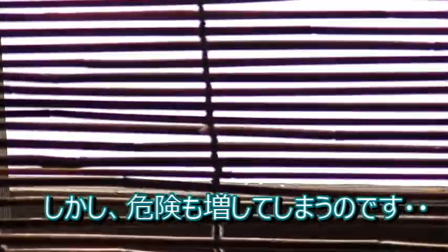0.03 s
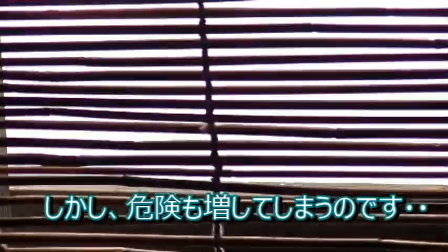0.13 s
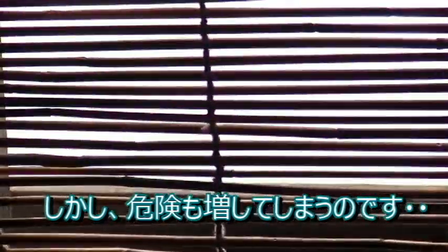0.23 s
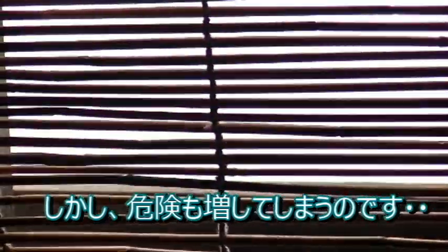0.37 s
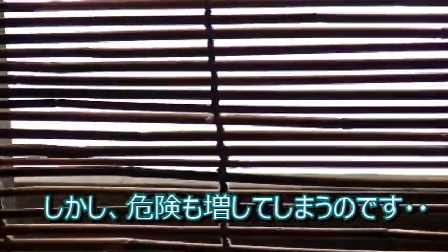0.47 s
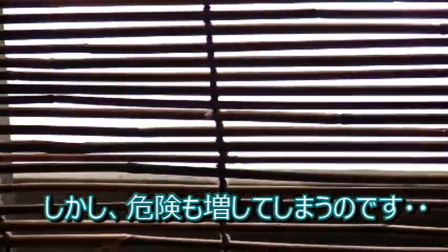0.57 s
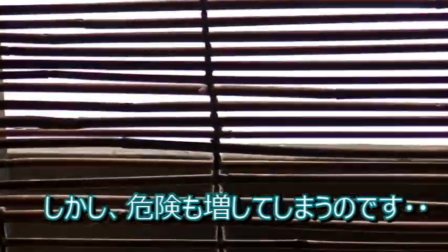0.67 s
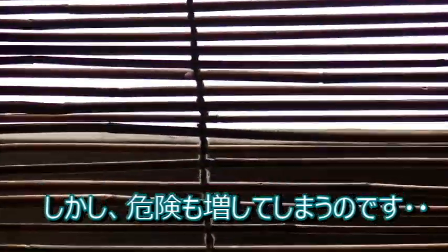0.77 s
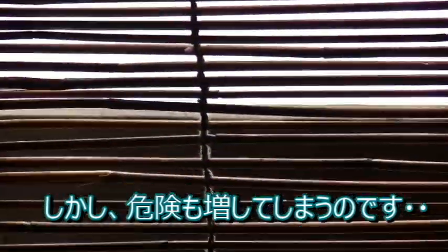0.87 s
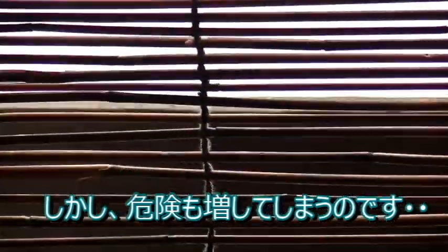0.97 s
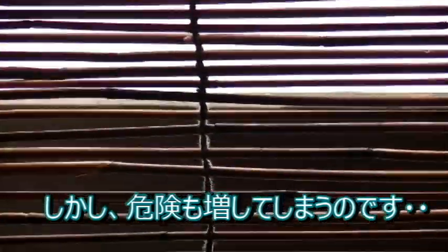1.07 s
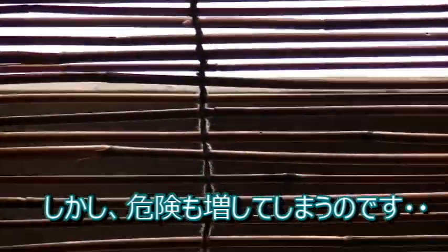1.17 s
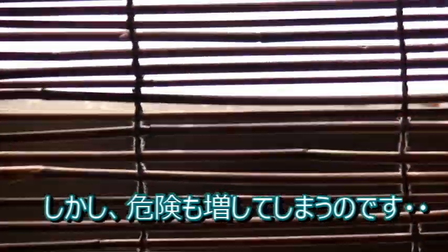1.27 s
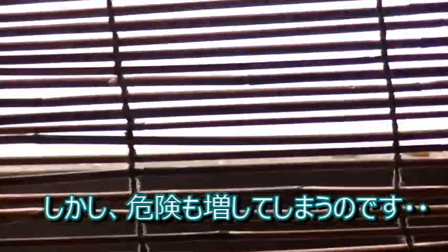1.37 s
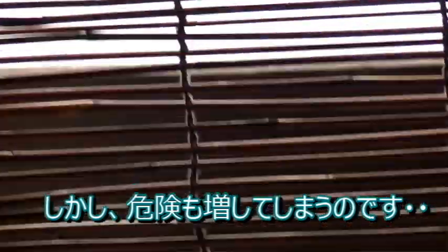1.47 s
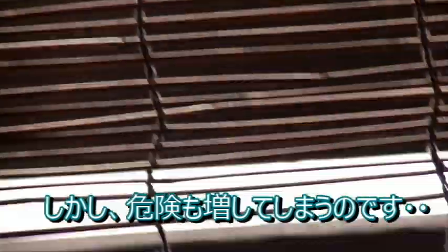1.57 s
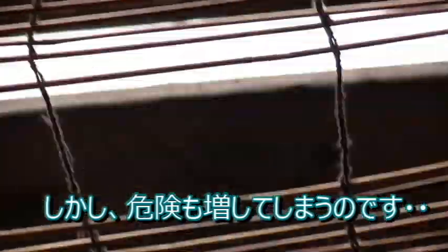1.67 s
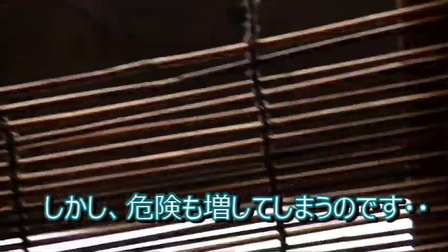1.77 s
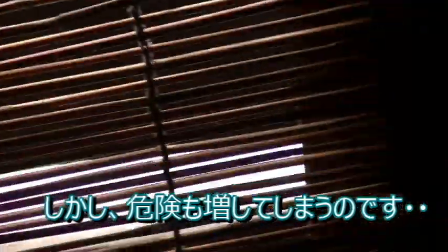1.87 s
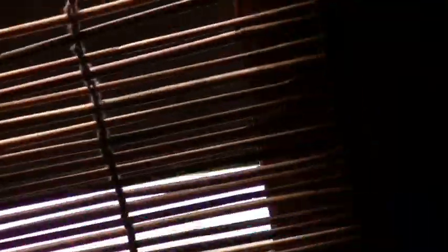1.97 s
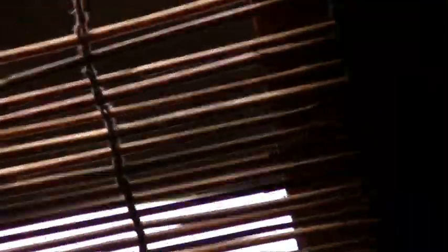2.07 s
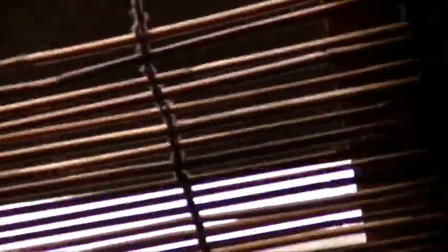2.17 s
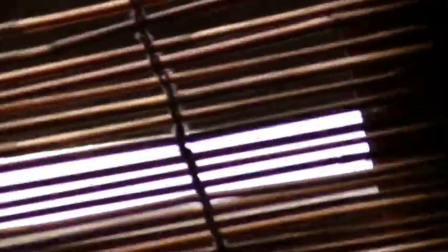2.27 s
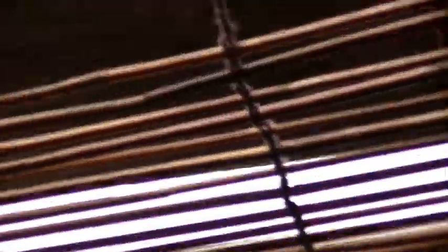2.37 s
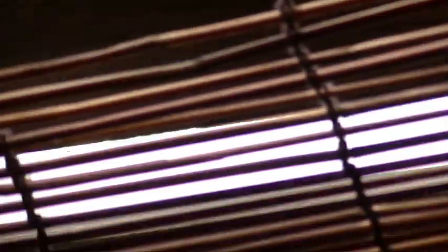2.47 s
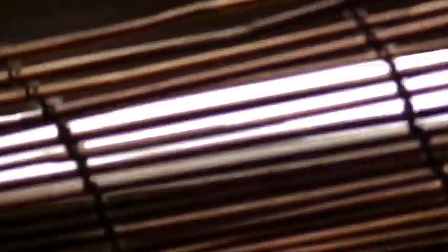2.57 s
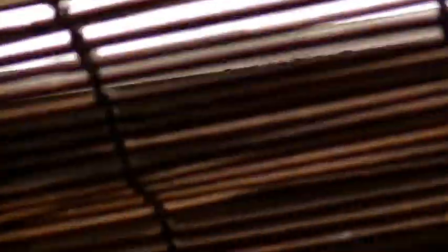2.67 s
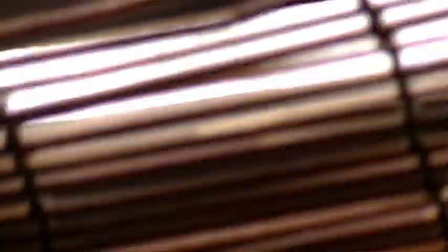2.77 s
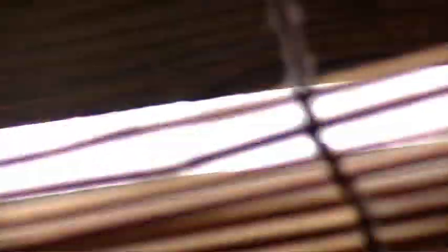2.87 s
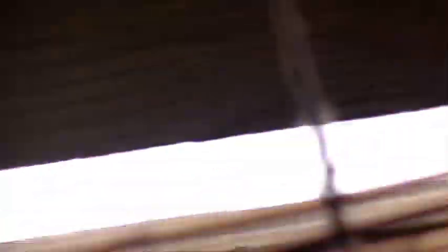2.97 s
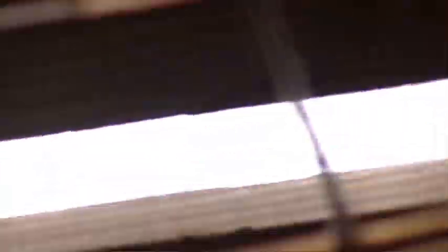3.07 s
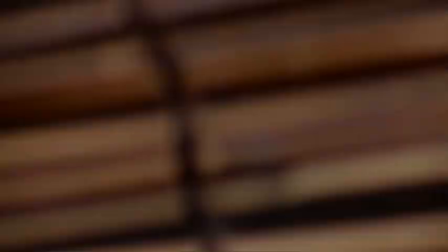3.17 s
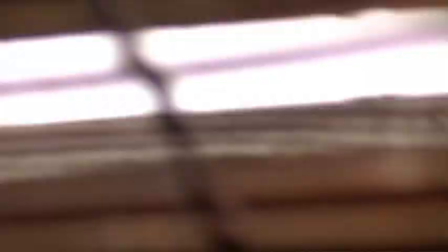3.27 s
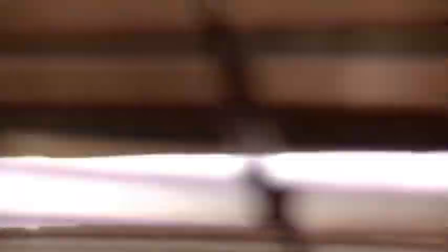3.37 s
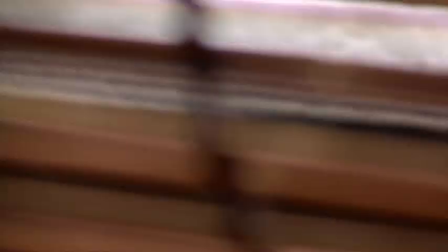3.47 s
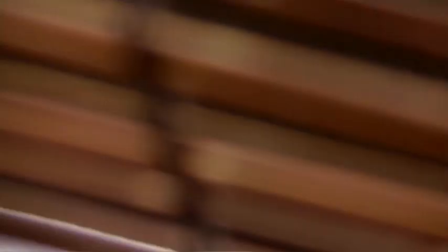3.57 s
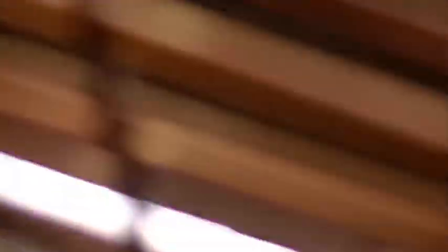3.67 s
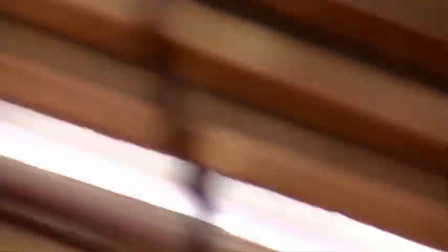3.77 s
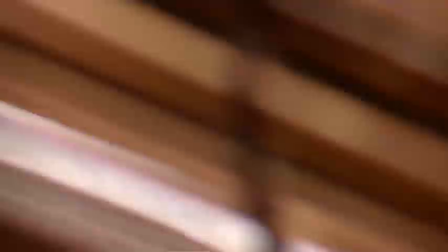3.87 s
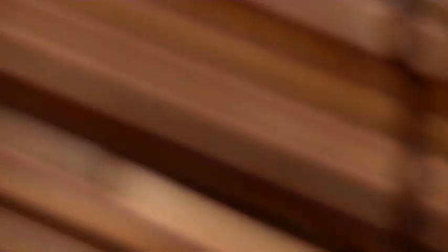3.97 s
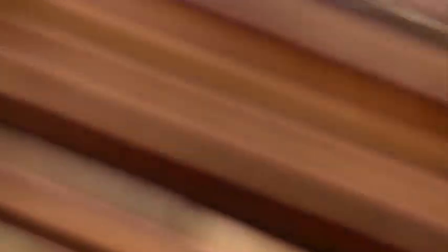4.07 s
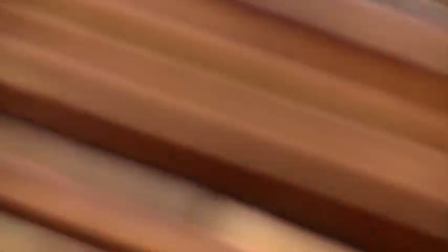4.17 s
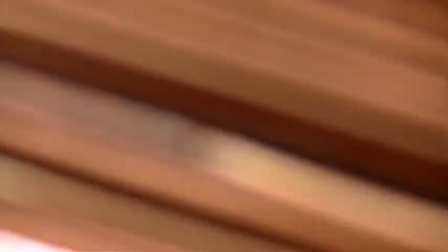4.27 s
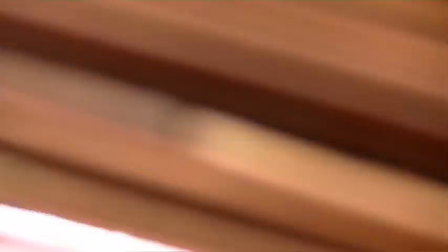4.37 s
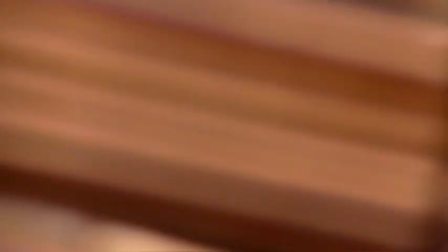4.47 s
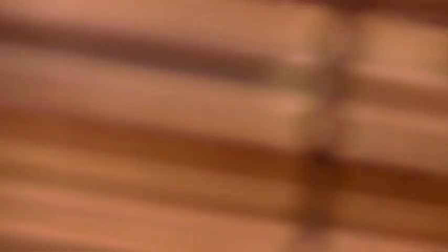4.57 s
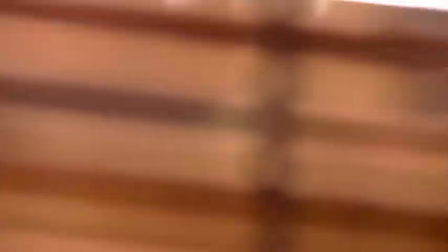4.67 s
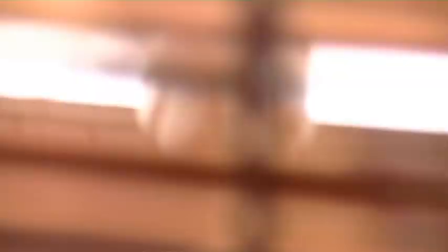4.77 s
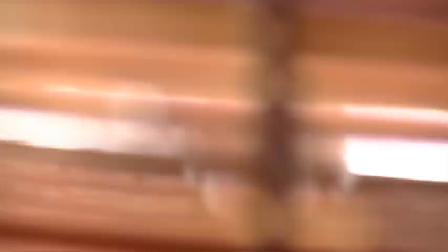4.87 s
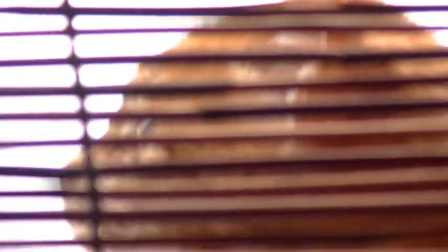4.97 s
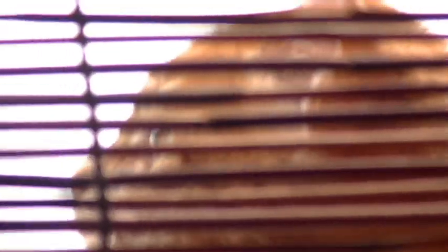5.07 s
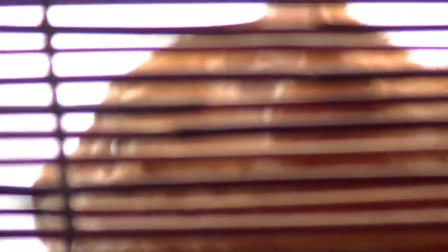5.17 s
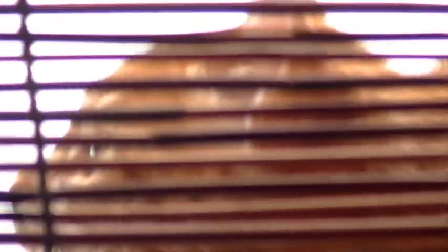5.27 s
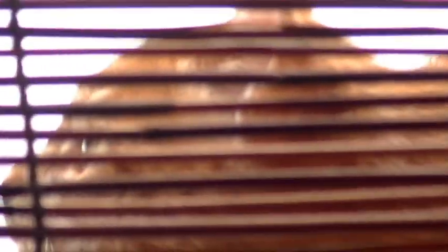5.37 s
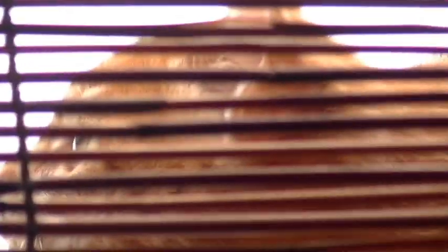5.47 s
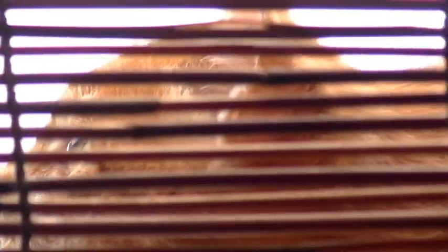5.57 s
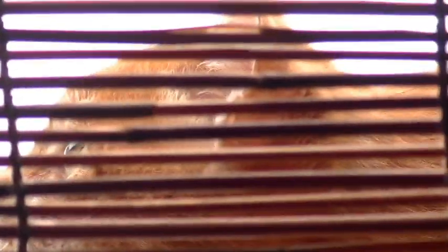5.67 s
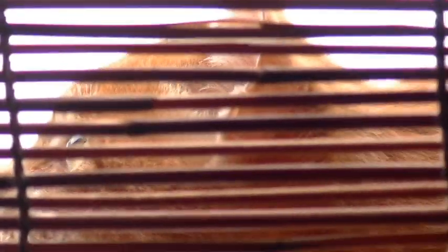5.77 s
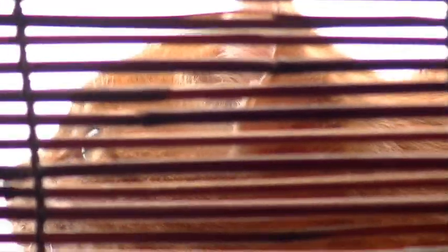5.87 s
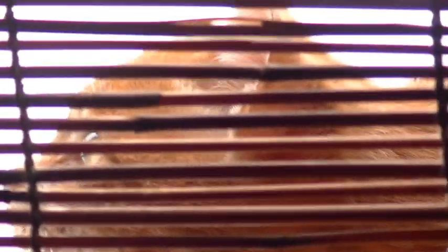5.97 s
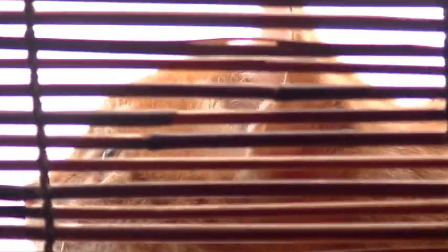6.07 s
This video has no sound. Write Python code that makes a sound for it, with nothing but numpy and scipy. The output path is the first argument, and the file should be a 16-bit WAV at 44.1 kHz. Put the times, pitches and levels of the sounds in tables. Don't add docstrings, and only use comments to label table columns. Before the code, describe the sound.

Faint handling taps and reed rustles grow into sharp, boxy plastic knocks and snaps, then abruptly give way to soft hum and hiss.

```python
import sys
import numpy as np
from scipy import signal
from scipy.fft import rfft, irfft
from scipy.io import wavfile
from scipy.ndimage import uniform_filter1d

SR = 44100
rng = np.random.default_rng(int(sys.argv[2]) if len(sys.argv) > 2 else 0)


def wav_record(signal):
    frames = np.transpose(np.atleast_2d(signal))
    bounded = np.clip(frames, -1, 1)
    quanta = np.round(bounded * 32767).astype(np.int16)
    wavfile.write(sys.argv[1], SR, quanta)


def to_linear_factor(level_db):
    exponent = np.asarray(level_db, float) / 20
    return 10 ** exponent


N = 269892
TIME = np.arange(N) / SR
BIN_HZ = np.fft.rfftfreq(N, 1 / SR)
CHANGE_S = 4.948
OPPOSITE = np.array([[1], [-1]])


def unit(x):
    return x / np.sqrt(np.mean(x ** 2))


def band(x, lo_hz, hi_hz):
    return signal.sosfilt(signal.butter(2, [lo_hz, min(hi_hz, .45 * SR)], "band", fs=SR, output="sos"), x)


def on_log(table, hz):
    points_hz, values = np.transpose(table)
    return np.interp(np.log(hz + 1), np.log(points_hz), values)


def colour(x, spectrum):
    return unit(irfft(rfft(x) * to_linear_factor(on_log(spectrum, BIN_HZ)), N))


def curve(table):
    start_s, level_db = np.transpose(table)
    return np.interp(TIME, start_s, level_db)


def walk(rate_hz):
    k = int(SR / rate_hz)
    return unit(uniform_filter1d(uniform_filter1d(rng.standard_normal(N), k), k))


def grit(spread_db):
    return unit(rng.standard_normal(N) * to_linear_factor(spread_db * np.minimum(rng.exponential(size=N), 6)))


def decay(t, t60_s):
    return np.exp(-np.log(1000) * t / t60_s)


def add(out, start_s, y):
    i = max(int(start_s * SR), 0)
    out[..., i:i + y.shape[-1]] += y[..., :N - i]


def ring(modes, contact_s, scatter_db, detune, soft_hz, lean_db=0., clatter=0.77, rough=0.45):
    hz, db, t60_s = np.transpose(modes)[:, :, None]
    t = TIME[:int(t60_s.max() * SR)]
    level_chance, pitch_chance = rng.standard_normal((2, len(modes), 1))
    taps = rng.laplace(size=SR // 10)
    tones = np.sin(2 * np.pi * hz * (1 + detune * pitch_chance) * t)
    tones = to_linear_factor(db + lean_db + scatter_db * level_chance) * tones
    body = (tones * decay(t, t60_s)).sum(0)
    blur = band(rng.standard_normal(SR)[:len(t)], hz.min(), hz.max()) * decay(t, t60_s.mean())
    body = body / np.std(body) + rough * blur / np.std(blur)
    x = TIME[:len(taps)] / np.clip(contact_s, .001, .04)
    force = np.minimum(10.4 * x, 1) * (np.exp(-2 * x ** 2) + clatter * np.exp(-x / 2.0))
    y = band(signal.fftconvolve(body, taps * force), 1.12 * hz.min(), soft_hz)
    loudest = uniform_filter1d(y ** 2, SR // 200).max() ** .5
    return y / (1.46 * loudest)


# pitch_hz [Hz], level_db [dB], t60_s [s]
BOOM_MODES = [(147, -7, 0.29), (215, 4.5, 0.014), (239.4, 3, 0.4), (282.4, 9.5, 0.12), (332.2, -3, 0.25),
              (371.5, 3, 0.14), (419, -6.5, 0.51), (451.3, -2, 0.23), (514, -46, 0.059)]
CASE_MODES = [(572.6, 2, 0.31), (648, 10, 0.075), (705, -2, 0.11), (758, -4.5, 0.17), (807, 9.5, 0.066),
              (866, 3, 0.1), (974, 7.5, 0.033), (1062, -1.5, 0.053), (1200, 8, 0.033), (1239, 5, 0.026),
              (1440, -22, 0.02)]
CLACK_MODES = [(1400, -13, 0.013), (1713, 3, 0.037), (1898, 1, 0.036), (2080, 7.5, 0.031), (2280, 1, 0.033),
               (2645, -17.5, 0.047), (3380, -10.5, .02)]
# start_s [s], level_db [dB], boom_db and clack_db [dB above level], favoured pitch_hz [Hz]
BLOWS = [(0.138, -38, 7.5, -13, 790), (0.022, -40.5, 1, -24, 760), (0.18, -41, -2, -17, 794),
         (0.225, -44, -15, -11, 700), (2.427, -36, 1, -6.5, 1190), (2.969, -23.5, -13, -21, 857),
         (3.15, -15.5, -6.5, -10.5, 1060), (3.163, -16, -3.5, -12, 1100), (3.222, -24.5, -1.5, -17, 1160),
         (3.359, -28.5, -0.5, -40, 1090), (3.42, -36, 6, -22, 1030), (3.478, -18, 3.5, -31, 840),
         (3.484, -10.5, -10.5, -10, 744), (3.493, -15, 2, -22, 1250), (3.512, -31, 11.5, -26, 630),
         (3.799, -19, -10.5, -12.5, 690), (3.945, -23.5, -6.5, -21, 720), (4.274, -26, -16, -31, 720),
         (4.28, -35, -3, -23, 1290), (4.369, -27.5, -7, -36, 785), (4.376, -38, -2, -29, 1270),
         (4.48, -42.5, 5, -2.5, 596), (4.607, -44, 4, 1, 900), (4.715, -9.5, -0.5, -13, 705),
         (4.729, -15, -5, -16, 870), (4.826, -7.5, -2.5, -12.5, 990), (4.86, -24, 3, -24, 780)]
# start_s [s], level_db [dB], boom_db [dB above level], favoured pitch_hz [Hz]
DRAGS = [(0.005, -44.5, 0, 756), (1.165, -49.5, 10.5, 580), (1.533, -40.5, -3, 740),
         (1.591, -43, 5.5, 1200), (1.625, -42.5, -5, 1090), (1.655, -42.5, 2.5, 790),
         (1.685, -42.5, 3.5, 1170), (1.715, -59, 2, 800), (1.889, -34, -2, 1090), (1.96, -39.5, 5, 1100),
         (2.341, -37, 0.5, 774), (2.689, -33, -2, 795), (2.886, -35.5, 0.5, 570), (3.084, -28, -16, 1340)]
# start_s [s], boom level_db [dB], case_db [dB above boom]
THUMPS = [(0.029, -33.5, -12), (0.065, -41, -16), (0.21, -41.5, 0), (0.252, -38, -15), (3.18, -17.5, -3),
          (3.286, -34, 0), (3.57, -17.5, -10.5), (3.6, -23.5, -13), (3.849, -31.5, -6), (4.308, -34, -27),
          (4.409, -31.5, -27), (4.766, -15.5, -10), (4.797, -27, 7), (4.902, -21.5, -8.5)]
BLOW_CONTACT_S, DRAG_CONTACT_S, THUMP_CONTACT_S = 0.011, 0.037, 0.012
DRAG_CLACK_DB, THUMP_CLACK_DB, THUMP_HZ = -6.5, -20, 738


def knocks():
    out, modes_hz = np.zeros(N), np.array(CASE_MODES)[:, :1]
    hits = [(s, db, boom_db, clack_db, BLOW_CONTACT_S, hz) for s, db, boom_db, clack_db, hz in BLOWS]
    hits += [(s, db, boom_db, DRAG_CLACK_DB, DRAG_CONTACT_S, hz) for s, db, boom_db, hz in DRAGS]
    hits += [(s, db + case_db, -case_db, THUMP_CLACK_DB, THUMP_CONTACT_S, THUMP_HZ)
             for s, db, case_db in THUMPS]
    for start_s, db, boom_db, clack_db, contact_s, hz in hits:
        lean_db = 16.5 * np.exp(-(np.log(modes_hz / hz) / .13) ** 2)
        case = ring(CASE_MODES, contact_s, 2.5, 0.012, 1520, lean_db)
        boom = ring(BOOM_MODES, 0.97 * contact_s, 1.5, 0.014, 710, rough=0.75)
        clack = ring(CLACK_MODES, 0.91 * contact_s, 2.5, 0.013, 3140)
        add(out, start_s - .0015, to_linear_factor(db) * case)
        add(out, start_s - .00385, to_linear_factor(db + boom_db) * boom)
        add(out, start_s - .0012, to_linear_factor(db + clack_db) * clack)
    return out


# start_s [s], pitch_hz [Hz], level_db
# [dB], t60_s [s]
LONE_RINGS = [(0.0, 142.5, -39.5, 0.76), (0.03, 239.4, -34, 0.59), (0.139, 146, -38.5, 0.72),
              (0.149, 341.4, -40, 0.68), (.215, 147, -38, 0.23), (0.219, 335.7, -41, 0.46),
              (3.199, 147, -32.5, 0.38), (3.479, 237, -31, 0.17), (3.489, 255, -25, 0.1),
              (4.712, 233.6, -7.5, 0.13), (4.824, 277.4, -10.5, 0.16),
              (1.533, 3280, -44, 0.14), (1.56, 3280, -50, .15), (1.585, 3340, -52, 0.17),
         (1.615, 3360, -52, 0.25), (1.535, 10786, -53, .12), (1.56, 6344, -54, .15), (1.61, 6380, -54, .15),
         (1.876, 2236, -40, .15), (1.876, 6300, -52, .12), (1.895, 1170, -33, 0.12),
         (2.378, 3340, -46, 0.11), (1.158, 2080, -40, .06), (2.43, 1205, -35.5, 0.19),
         (2.685, 815, -40, 0.17), (2.885, 302, -30, 0.17), (2.885, 1700, -40, 0.12),
         (2.92, 1940, -38, 0.091), (3.09, 1874, -34, .2), (3.085, 2600, -36, 0.2),
         (3.11, 2252, -28.5, 0.16), (3.085, 3300, -40, 0.28), (3.15, 374, -18.5, 0.17),
         (3.151, 1010, -16.5, .12), (3.154, 1286, -18, 0.11), (3.22, 1205, -26, 0.11),
         (4.272, 797, -24.5, 0.11), (4.274, 1290, -39, 0.086), (4.715, 710, -9, 0.077),
         (4.715, 1265, -14, 0.087), (4.725, 935, -14, .08), (4.724, 398, -9, 0.059),
         (4.755, 297.6, -14, .18), (4.74, 593, -23, .12), (4.828, 1060, -24, 0.1), (4.83, 568, -19, 0.13),
         (4.853, 369.4, -17, 0.21), (4.915, 433, -30, .2)]


def lone_modes():
    out, t = np.zeros(N), TIME[:SR // 2]
    for start_s, hz, db, t60_s in LONE_RINGS:
        swell = np.minimum(t / 0.0056, 1)
        add(out, start_s, to_linear_factor(db) * swell * decay(t, t60_s) * np.sin(2 * np.pi * hz * t))
    return out


# start_s [s], level_db [dB], pitch_hz [Hz], pitched share [0-1]
TICKS = [(0.0634, -37, 2520, 0.7), (.064, -45, 4050, 0.65), (0.1356, -42, 2040, 0.24),
         (0.3082, -43, 2570, 0.46), (0.375, -44.5, 4070, 0.64), (1.429, -47, 2290, 0.2),
         (1.6676, -39, 2280, 0.3), (1.6894, -56, 2260, 0.4), (1.8123, -42, 3600, 0.54),
         (2.2857, -36, 2320, 0.2), (2.6818, -20, 5380, 0.43), (2.8889, -18.5, 3430, 0.18),
         (2.9683, -27, 4000, 0.4), (3.1522, -28, 2170, 0.2), (3.579, -22, 2840, 0.13),
         (3.903, -30, 2250, 0.14), (4.1036, -39, 2310, 0.36), (4.166, -43.5, 2700, 0.7),
         (4.277, -42, 2040, 0.9), (4.372, -46, 2060, .8), (4.4804, -34, 2260, 0.5), (4.509, -45, 2220, 0.5),
         (4.6083, -41, 2060, 0.7), (4.7155, -17, 2050, 0.95), (4.7294, -28, 2070, 0.3),
         (4.7714, -29, 4080, 0.23), (4.8272, -21, 1940, 0.9), (4.9095, -23, 3190, 0.6),
         (4.912, -32, 3300, 0.1), (5.156, -44.5, 3320, 0.36), (5.9, -41, 1880, 0.6),
         (5.958, -41, 2570, 0.84), (5.963, -39, 2140, 0.7)]
# start_s [s], level_db [dB], top_db [dB above level], pitched share [0-1]
SNAPS = [(1.16, -35, -13, 0.9), (1.942, -34, -9, 0.34), (2.266, -45.5, 9.5, 0.6), (2.3367, -36, -9, 0.4),
         (2.426, -44, -5, 0.7), (3.051, -56, 9, 0.5), (3.4336, -37, -13, 1), (3.6165, -49.5, 12, 0.7),
         (3.6637, -46.5, 4, 0.4), (3.77, -27.5, -19, 0.24), (3.79, -13, -13.5, 0.1),
         (3.929, -28.5, -17, 0.28), (5.071, -48, 5, 0.7), (6.041, -45, -32, 0.62)]
TICK_TOP_DB, SNAP_HZ = -38, 2074


def ticks():
    out, t = np.zeros(N), TIME[:1500]
    tips = [(s, db, hz, TICK_TOP_DB, share) for s, db, hz, share in TICKS]
    tips += [(s, db, SNAP_HZ, top_db, share) for s, db, top_db, share in SNAPS]
    for start_s, db, hz, top_db, share in tips:
        snap = rng.standard_normal(len(t))
        pitched = share * np.sin(2 * np.pi * hz * t) * np.exp(-t / 0.003) * np.minimum(t / .0007, 1)
        crack = 0.9 * (1 - share) * band(snap * np.exp(-t / 0.0029), 1900, 5370)
        crack = crack + to_linear_factor(top_db + 2.5) * band(snap * np.exp(-t / 0.0021), 4400, 12000)
        add(out, start_s - .0012, (pitched + crack) * to_linear_factor(db + 3.5))
    return out


# start_s [s], level_db [dB], centre pitch_hz [Hz]
CLICKS = [(1.1534, -49, 10100), (1.885, -39, 8000), (1.896, -46, 7000), (1.906, -45, 5000),
          (2.2618, -43, 9900), (2.2664, -46, 9500), (2.285, -32, 9000), (2.3356, -36, 13000),
          (2.6807, -19, 7040), (2.888, -32, 5590), (2.966, -24, 7820), (3.049, -43, 12500),
          (3.058, -33, 8500), (3.1582, -38, 11000), (3.2904, -31, 11000), (3.3278, -43, 7030),
          (3.4342, -25, 5200), (3.5783, -31, 5060), (3.6137, -36, 11500), (3.7693, -29, 4480),
          (3.7888, -15, 5470), (3.928, -27, 7500), (4.714, -31, 12000), (4.7178, -21, 9000),
          (4.7352, -42, 9000), (4.7698, -32, 8800), (4.7976, -42, 9500), (4.8198, -39, 12000),
          (4.825, -24, 6000), (4.829, -39, 12500), (4.8328, -33, 10000), (5.0696, -38, 11600)]


def clicks():
    out, t = np.zeros(N), TIME[:400]
    span = 1.4
    for start_s, db, hz in CLICKS:
        burst = rng.standard_normal(len(t)) * np.exp(-t / .0008)
        y = band(burst, hz / span, hz * span)
        add(out, start_s - .0003, to_linear_factor(db - 4.5) * y / np.abs(y).max())
    return out


# pitch_hz [Hz], level_db [dB], t60_s [s]
RING_MODES = [(1995, 4, 0.066), (2244, 11, 0.017), (3340, -6, 0.042), (5570, -6, 0.025), (6350, 1.5, 0.019),
              (11000, 3.5, 0.034), (11650, 7.5, 0.027)]
# start_s [s], level_db [dB], favoured pitch_hz [Hz], lift_db [dB], shake_s [s]
JINGLES = [(1.532, -37.5, 3310, 18, 0.0061), (1.555, -50, 3310, 17, 0.044), (1.595, -50, 3310, 17, 0.03),
           (1.625, -59, 3310, 12, 0.027), (1.877, -43, 6350, 3, .02), (1.884, -41, 2230, -7, 0.036),
           (1.95, -39.5, 2230, 4, 0.017), (2.305, -33.5, 6350, 7.5, 0.0032),
           (2.383, -35.5, 2740, 24, 0.008), (2.426, -38, 11600, 12, 0.012), (3.081, -28.5, 3340, -4, 0.023),
           (3.097, -25, 6350, 11, 0.021)]


def jingles():
    out, lowest_hz = np.zeros(N), RING_MODES[0][0]
    octaves = np.log2(np.array(RING_MODES)[:, :1] / lowest_hz)
    for start_s, db, hz, lift_db, shake_s in JINGLES:
        distance = octaves - np.log2(hz / lowest_hz)
        lean_db = -1 * octaves + lift_db * np.exp(-(distance / 0.29) ** 2)
        jingle = ring(RING_MODES, shake_s, 1.0, 0.0017, 7800, lean_db, clatter=0.5, rough=0.15)
        add(out, start_s - .001, to_linear_factor(db) * jingle)
    return out


# start_s [s], level_db [dB]
RUSTLE = [(0.0, -56), (0.19, -65), (0.94, -64), (1.52, -60.5), (2.27, -54), (2.47, -58), (2.68, -65),
          (2.78, -51), (3.5, -56), (3.73, -57.5), (4.02, -65), (4.66, -57), (4.9, -48), (4.955, -63),
          (5.62, -66.5), (5.76, -58), (5.93, -61), (6.12, -59)]
# middle start_s [s], level_db [dB], top_db [dB above level], length_s [s]
SCRAPES = [(0.423, -54, -7, 0.021), (1.429, -53, -8, 0.018), (1.566, -50, -13, 0.025),
           (1.613, -61, -5, 0.047), (1.718, -63, 15, 0.014), (1.892, -45.5, -9, 0.023),
           (1.962, -67, 8, 0.043), (2.342, -47, -1, 0.012), (2.629, -47.5, -3, 0.027),
           (2.697, -35, -11, 0.014), (2.901, -47.5, -10, 0.027), (2.961, -51.5, 7, 0.016),
           (3.087, -36, -5.5, 0.0076), (3.173, -44.5, -1.5, 0.017), (3.237, -52.5, -5, 0.028),
           (3.283, -62, -17, 0.026), (3.342, -60.5, 7, 0.028), (3.441, -38.5, -10, 0.013),
           (3.48, -36.5, -15, 0.022), (3.58, -36, -12, 0.013), (3.913, -49.5, -40, 0.043),
           (4.23, -58, -34, 0.012), (4.689, -46.5, -13, 0.0091), (4.726, -33.5, -18, 0.0095),
           (4.828, -30, -7.5, 0.0049), (4.913, -47, -34, 0.0091), (5.456, -59, -6.5, 0.028),
           (5.78, -52, 1, 0.025), (5.83, -72, 4, 0.05), (5.88, -53, -9, 0.029), (6.065, -56.5, 2, 0.012)]


def rustle():
    press_db = curve(RUSTLE)
    low, top = to_linear_factor(press_db), to_linear_factor(-65.5 + 0.49 * (press_db + 60.5))
    for middle_s, db, top_db, length_s in SCRAPES:
        x = np.arange(-3, 8, 1 / (length_s * SR))
        swell = np.exp(-np.where(x < 0, 1.06 * x ** 2, 0.66 * np.abs(x) ** 1.18))
        add(low, middle_s - 3 * length_s, to_linear_factor(db) * swell)
        add(top, middle_s - 3 * length_s, to_linear_factor(db + top_db) * swell)
    grains = grit(2.3) * to_linear_factor(2.87 * walk(55))
    bright = 1.1 * grains + 0.45 * grit(2.6) * to_linear_factor(1.5 * walk(60))
    return low * unit(band(grains, 810, 4860)) + top * unit(band(bright, 3570, 10160))


# start_s [s], level_db [dB]
HAND = [(0.0, -34.5), (0.1, -49), (0.27, -53.5), (1.01, -52.5), (1.2, -55), (1.67, -53.5), (2.29, -50),
        (2.55, -55.5), (2.67, -48), (2.98, -48.5), (3.18, -35), (3.29, -31.5), (3.5, -52), (3.58, -31),
        (3.82, -41.5), (4.04, -45), (4.63, -54.5), (4.95, -31.5)]
# start_s [s], level_db [dB]
PALM = [(0.0, -50), (0.78, -73), (1.1, -74), (1.2, -55), (1.4, -71), (2.31, -68), (2.45, -55), (2.72, -59),
        (2.8, -51), (2.94, -54.5), (3.23, -40.5), (3.43, -50), (3.51, -38.5), (3.6, -47.5), (4.29, -56.5),
        (4.55, -52), (4.66, -57), (4.74, -48)]
# pitch_hz [Hz], level_db [dB per Hz]
GRIP = [(300, -16.5), (500, -4), (780, -6), (900, -8.5), (1400, -19.5), (2000, -24), (3000, -32.5),
        (5000, -40.5)]


def hand():
    effort_db = curve(HAND)
    boom = sum(to_linear_factor(0.32 * db) * unit(band(grit(2.8), hz / 1.11, hz * 1.056)) for hz, db, _ in BOOM_MODES)
    mid_db = -50.5 + 0.53 * (effort_db + 50.0)
    mid = to_linear_factor(mid_db + 0.32 * walk(19)) * colour(grit(1.76), GRIP)
    sub = to_linear_factor(curve(PALM)) * unit(band(rng.standard_normal(N), 43, 167))
    return to_linear_factor(0.5 * walk(51)) * (to_linear_factor(effort_db) * unit(boom) + mid) + sub


def loose():
    level_db = -58.5 + 0.14 * (curve(HAND) + 58) + 3.3 * walk(9.9)
    return to_linear_factor(level_db) * unit(band(rng.standard_normal(N), 35, 800))


# middle of the chirp [s], level_db [dB]
CHIRPS_MID = [(0.063, -57), (0.101, -61), (0.123, -64), (0.169, -67), (0.222, -67), (0.25, -65),
              (0.267, -67), (0.341, -66), (0.39, -64), (0.593, -66), (0.659, -63), (0.693, -68),
              (0.782, -68), (0.903, -63), (0.933, -64), (0.959, -65), (1.002, -66), (1.028, -62),
              (1.07, -64), (1.117, -65), (4.967, -63), (5.001, -65), (5.033, -64), (5.065, -63),
              (5.098, -63), (5.132, -62), (5.167, -64), (5.191, -65), (5.215, -69), (5.233, -63),
              (5.267, -65), (5.291, -64), (5.332, -61), (5.358, -63), (5.398, -66), (5.427, -63),
              (5.446, -67), (5.465, -62), (5.501, -67), (5.532, -67), (5.56, -65), (5.618, -69),
              (5.635, -67), (5.65, -66), (5.668, -68), (5.807, -60)]
CHIRPS_TOP = [(0.048, -68), (0.118, -70), (0.49, -68), (0.518, -66), (0.552, -70), (0.584, -70),
              (0.726, -70), (0.786, -68), (0.828, -69), (0.85, -67), (1.017, -69), (5.285, -68),
              (5.35, -66), (5.415, -68), (5.484, -65), (5.551, -66), (5.575, -66), (5.721, -68),
              (5.911, -64), (5.942, -65), (5.965, -68), (6.009, -66), (6.034, -67), (6.1, -65)]
MID_HZ, TOP_PARTIAL_HZ, CHIRP_S = 3877, 5833, .0052


def motor():
    out, t = np.zeros(N), TIME[:int(6 * CHIRP_S * SR)]
    envelope = np.exp(-(t / CHIRP_S - 3) ** 2)
    for hz, chirps in (MID_HZ, CHIRPS_MID), (TOP_PARTIAL_HZ, CHIRPS_TOP):
        for start_s, db in chirps:
            add(out, start_s - 3 * CHIRP_S, to_linear_factor(db + 5) * envelope * np.sin(2 * np.pi * hz * t))
    return out


# pitch_hz [Hz], level_db [dB per Hz]
HUM = [(35, -63), (60, -47), (360, -20.5), (398, -17.5), (515, -14.5), (568, -5.5), (619, -13), (714, -7),
       (871, -11), (1800, -31), (2340, -50.5), (3960, -120)]
# start_s [s], length_s [s], level_db [dB]
HUM_SWELLS = [
    (5.003, 0.034, -57),
    (5.133, 0.055, -62),
    (5.273, 0.051, -59),
    (5.442, 0.018, -57.5),
    (5.494, 0.067, -56.5),
    (5.72, 0.088, -71),
    (5.792, 0.032, -60),
    (5.951, 0.062, -55),
    (6.083, 0.043, -61),
]


def hum():
    level = to_linear_factor(-64)
    for start_s, length_s, db in HUM_SWELLS:
        inside_s = np.minimum(TIME - start_s, start_s + length_s - TIME)
        level = level + to_linear_factor(db) * np.clip(inside_s / 0.013 + 1, 0, 1)
    drone = level * to_linear_factor(2.0 * walk(28.0)) * colour(rng.standard_normal(N), HUM)
    return drone + to_linear_factor(-61.0 + 1.0 * walk(31)) * np.sin(2 * np.pi * 702 * TIME)


# pitch_hz [Hz], level_db [dB per Hz]
HISS = [(40, -14), (250, -8.5), (500, -4), (900, -1), (1500, -3), (3500, -9.5), (6000, -11), (10000, -18.5),
        (13500, -17), (16000, -26.5)]


def hiss(first):
    mid, side = (colour(rng.standard_normal(N), HISS) for _ in range(2))
    return to_linear_factor(-59.75 - 0.5 * first) * (mid + 1.22 * side * OPPOSITE)


# pitch_hz [Hz], level_db [dB]
SIDE_LEAK = [(40, -9), (200, -25), (600, -20), (1200, -12), (3000, -8), (8000, -3), (15000, 0)]


def spread(x):
    lead = .55 * np.minimum(BIN_HZ / 6000, 1)
    lean = 0.65 * rfft(x * np.tanh(2 * walk(45)))
    side = irfft((lean + 1j * lead * rfft(x)) * to_linear_factor(on_log(SIDE_LEAK, BIN_HZ)), N)
    return np.array([x + side, x - side])


def narrow(x):
    mid, side = (x[0] + x[1]) / 2, (x[0] - x[1]) / 2
    dull = to_linear_factor(-7.5) * signal.sosfilt(signal.butter(1, 8000, fs=SR, output="sos"), side)
    side = np.where((TIME > CHANGE_S) & (TIME < 5.8), dull, side)
    return np.array([mid + side, mid - side])


def scene():
    first = np.clip((CHANGE_S - TIME) / 0.0017, 0, 1)
    case = first * (knocks() + lone_modes() + jingles() + hand()) + (1 - first) * hum()
    ports = spread(case + ticks() + clicks() + rustle() + motor())
    return ports + first * loose() * OPPOSITE + hiss(first)


def roll_off(x):
    return signal.sosfilt(signal.butter(12, 16090, fs=SR, output="sos"), x)


def record(dry):
    rounded = np.tanh(0.98 * narrow(dry)) / 1.211
    mix = signal.sosfilt(signal.ellip(8, .2, 60, 15750, fs=SR, output="sos"), rounded)
    return roll_off(mix)


dry = scene()
out = record(dry)
wav_record(out)
```